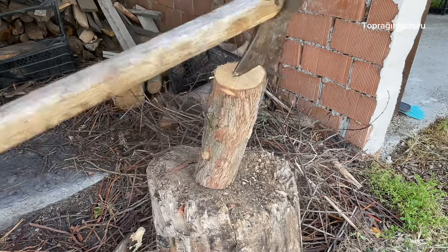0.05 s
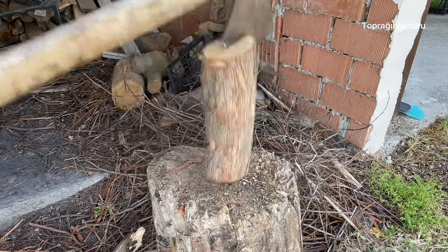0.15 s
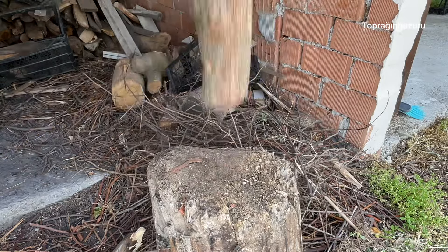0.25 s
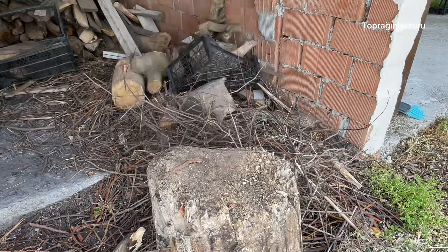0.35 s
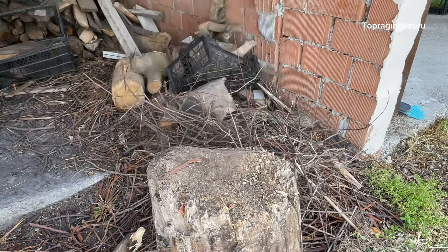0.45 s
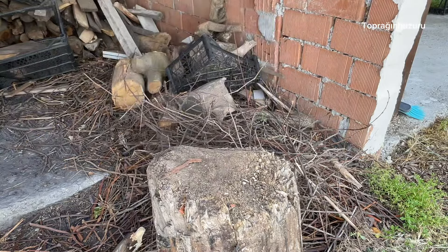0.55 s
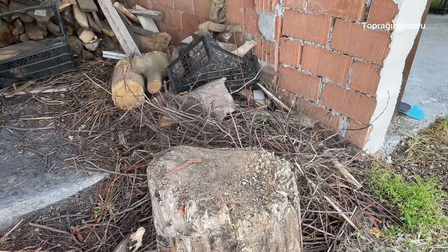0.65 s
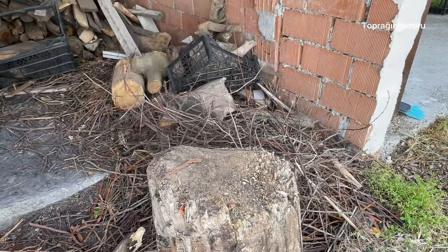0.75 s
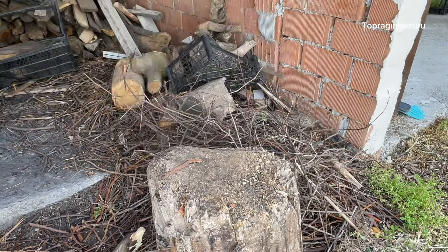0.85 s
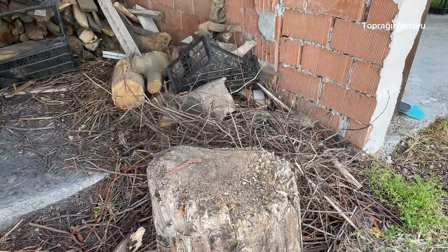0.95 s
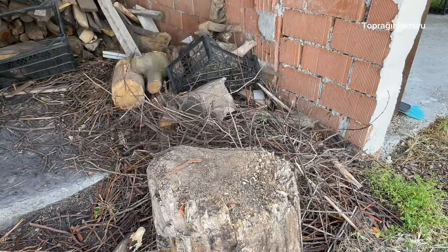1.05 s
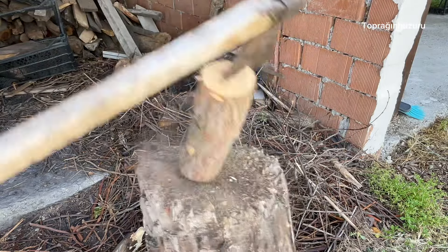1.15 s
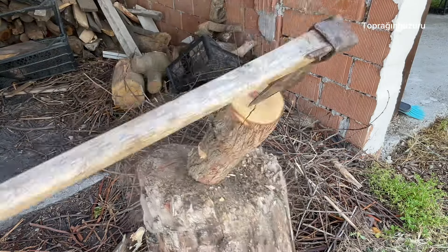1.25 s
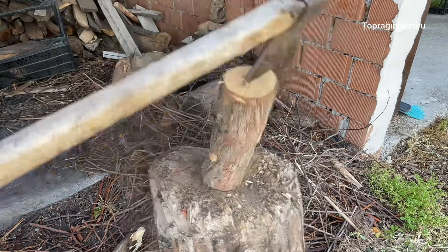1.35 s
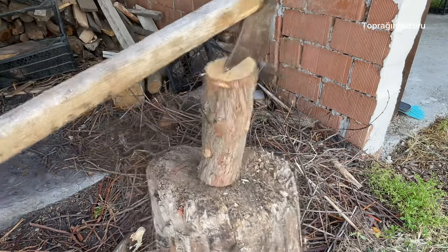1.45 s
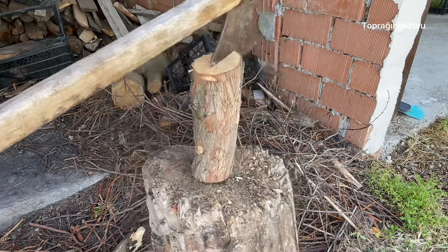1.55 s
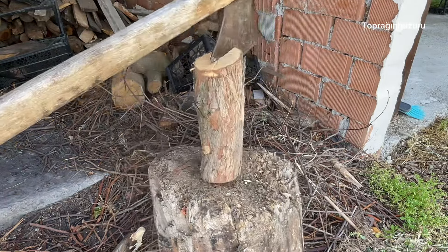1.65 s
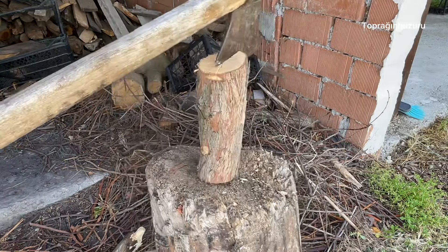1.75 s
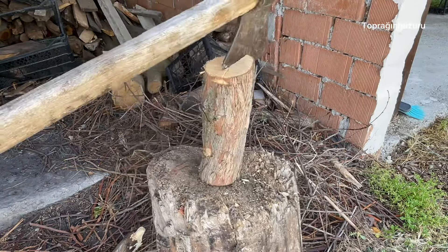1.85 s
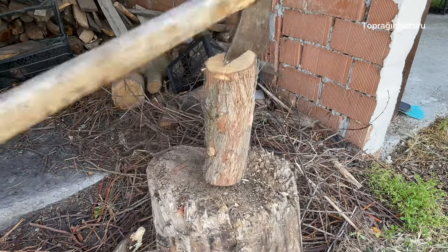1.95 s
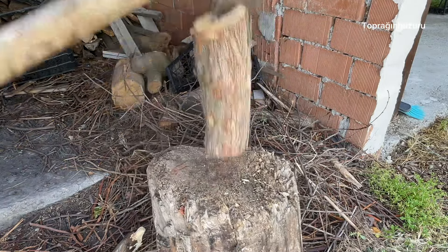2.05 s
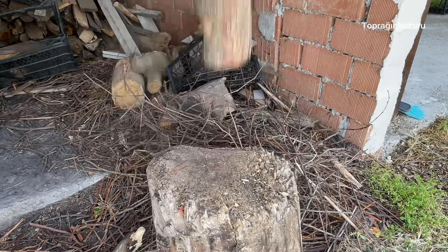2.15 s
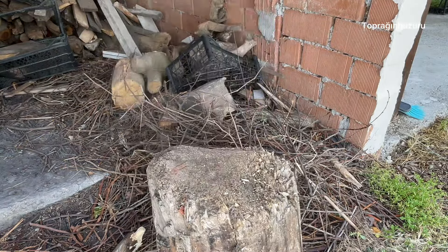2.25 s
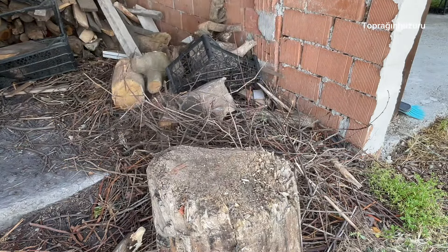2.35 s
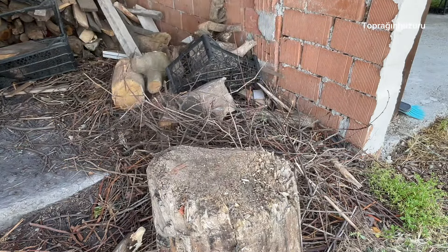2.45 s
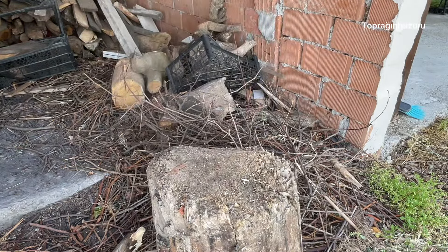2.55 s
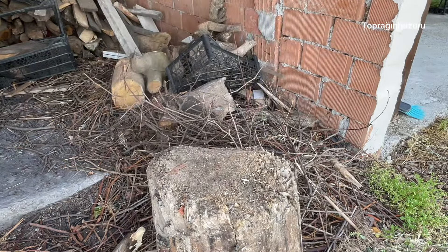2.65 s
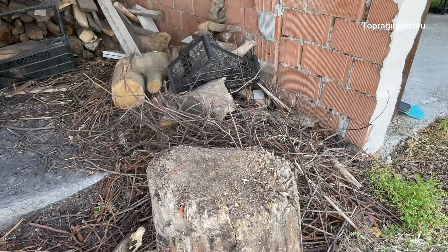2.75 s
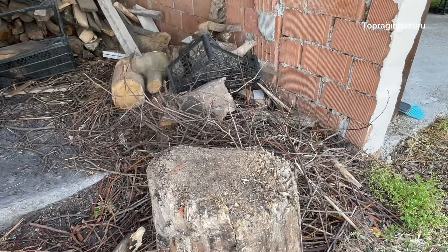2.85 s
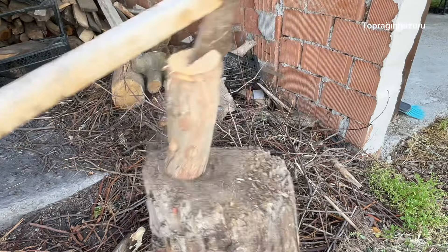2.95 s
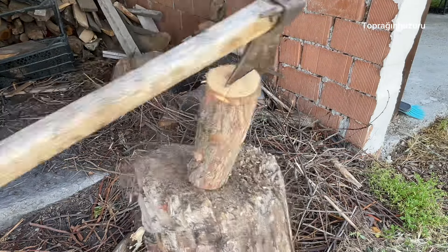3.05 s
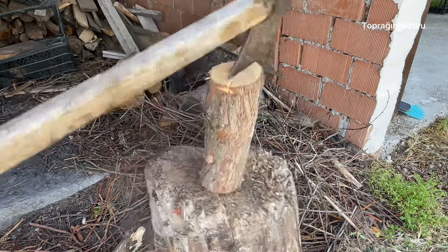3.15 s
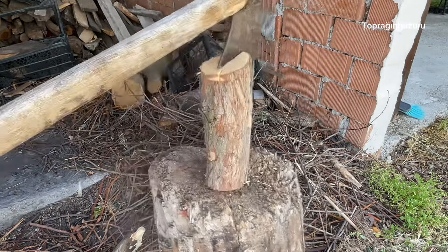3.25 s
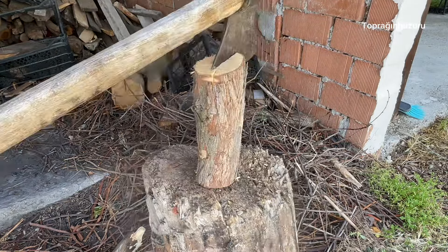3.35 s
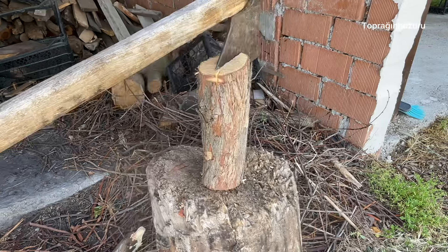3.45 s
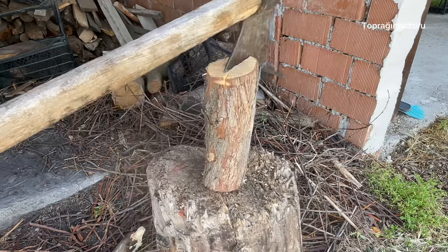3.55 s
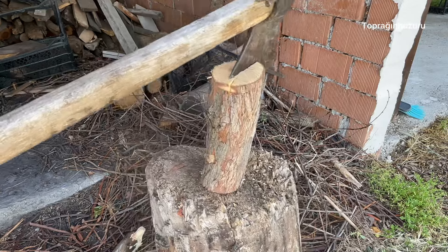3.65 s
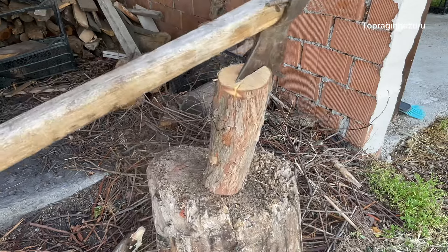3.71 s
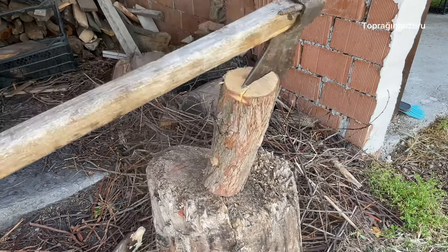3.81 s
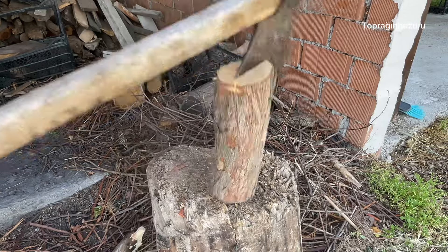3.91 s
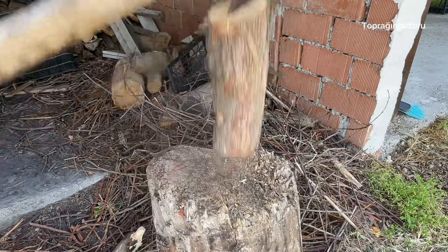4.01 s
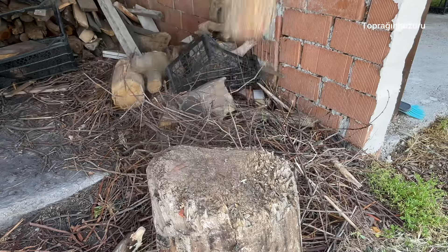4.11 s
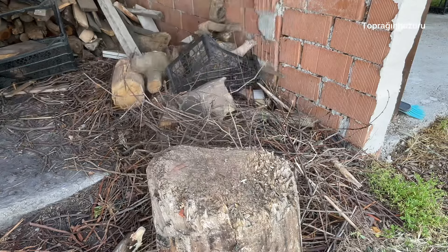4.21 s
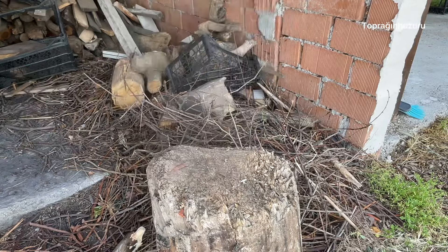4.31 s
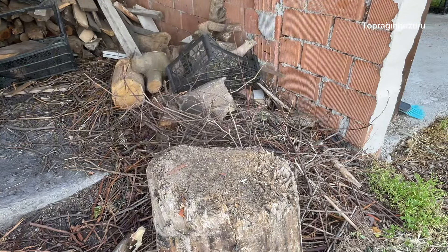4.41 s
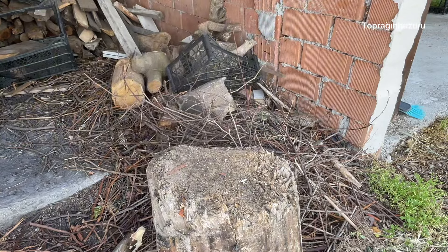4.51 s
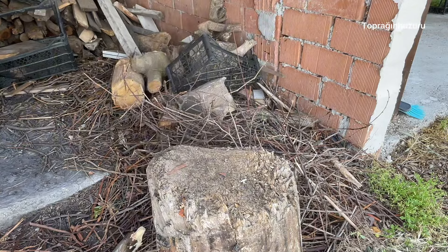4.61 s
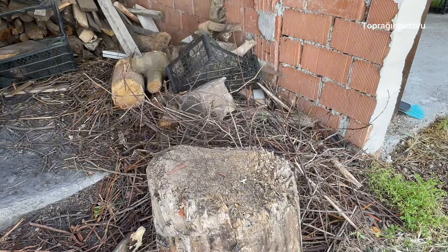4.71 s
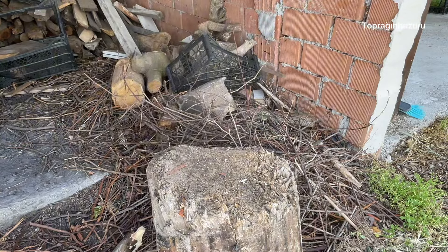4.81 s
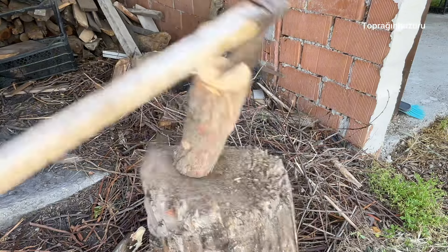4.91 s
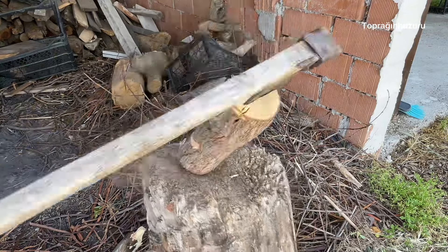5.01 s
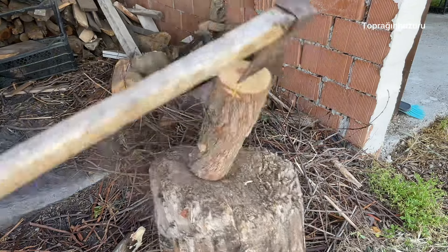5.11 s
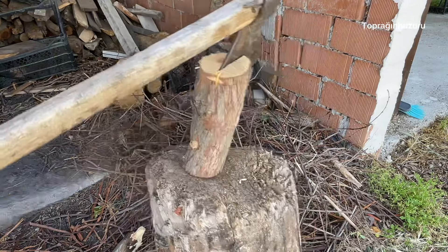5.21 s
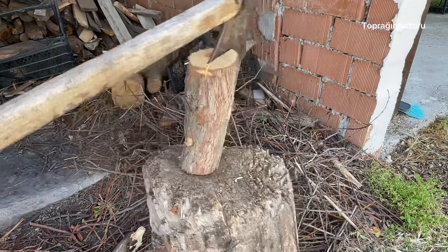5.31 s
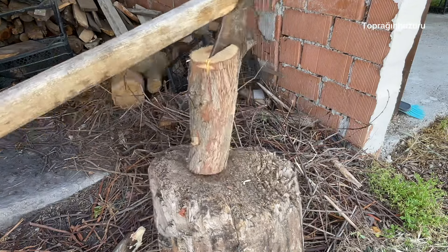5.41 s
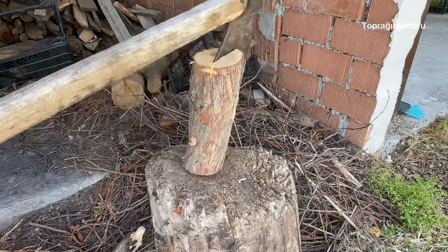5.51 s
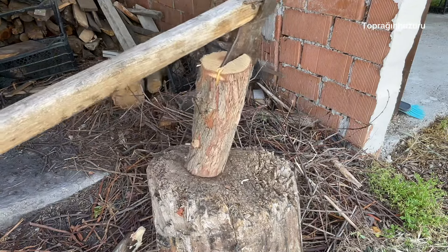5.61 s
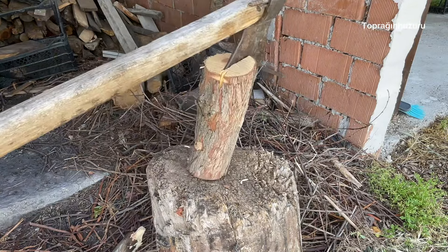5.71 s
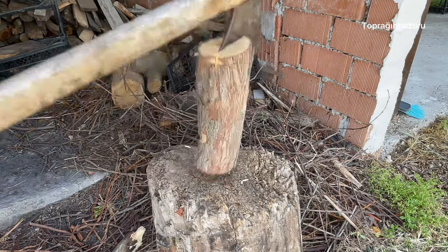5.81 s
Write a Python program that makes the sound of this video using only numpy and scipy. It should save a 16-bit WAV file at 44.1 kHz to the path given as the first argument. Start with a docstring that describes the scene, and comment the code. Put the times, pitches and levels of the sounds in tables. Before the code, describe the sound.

A log stuck on an axe cracks and thumps on a chopping block three times, about two seconds apart, in a quiet yard.

```python
"""A yard beside a brick wall: a short log with an axe stuck in it is slammed three times onto a stump, a metre off.
Each blow is a sum of filtered noise (crack), damped modes (log, handle, stump), slow wave packets (ground)
and echoes by convolution; bark crumbs and dust patter down as shaped noise. Behind lie far birds, as
frequency-modulated sines with diffuse echoes, and a low town rumble of noise bands and wavering hum.
"""
import sys
import numpy as np
from scipy import signal
from scipy.fft import rfft, irfft
from scipy.io import wavfile
from scipy.ndimage import uniform_filter1d

SR = 44100
rng = np.random.default_rng(int(sys.argv[2]) if len(sys.argv) > 2 else 0)


def generate_wav(sig):
    """Save sig (samples, or channels by samples) to the path in sys.argv[1] as 16-bit PCM at SR."""
    pcm = np.round(np.clip(np.atleast_2d(sig).T, -1, 1) * 32767).astype(np.int16)
    wavfile.write(sys.argv[1], SR, pcm)


N = 258867  # length in samples


def undb(db):
    """Logarithmic scale: the amplitude factor of a level in dB."""
    return 10 ** (np.asarray(db) / 20)


def level(x, db):
    """Mean power: scale to an rms level."""
    return x * undb(db) / np.sqrt(np.mean(x ** 2))


def fade(t, t60):
    """Exponential damping: 60 dB down after t60."""
    return np.exp(-np.log(1000) * t / t60)


def band(x, hz, octaves):
    """Band-pass filtering along the last axis, centred on hz."""
    top_hz = min(hz * 2 ** (octaves / 2), .48 * SR)
    edges = [hz * 2 ** (-octaves / 2), top_hz]
    return signal.sosfilt(signal.butter(2, edges, "band", fs=SR, output="sos"), x)


def bright(x):
    """Cascaded filtering: three passes give a treble band with steep sides."""
    for _ in range(3):
        x = band(x, 11000, .65)
    return x


def colour(x, points):
    """Spectral weighting by (f/Hz, level/dB) points, joined along log frequency."""
    hz, db = np.transpose(points)
    f = np.fft.rfftfreq(x.shape[-1], 1 / SR) + 1
    gain = undb(np.interp(np.log(f), np.log(hz), db))
    return irfft(rfft(x) * gain, x.shape[-1])


def walk(rate, size=N):
    """Slow random modulation: levels held 1 / rate s and smoothed twice; spread near 1."""
    k = int(SR / rate)
    held = np.repeat(rng.standard_normal(size // k + 1), k)
    return 1.4 * uniform_filter1d(uniform_filter1d(held, k), k)[:size]


def pan(db):
    """Level difference between the ports: left over right in dB."""
    return undb(np.array([[db], [-db]]) / 2)


def add(out, s, x):
    """Superposition: mix x in at s seconds."""
    i = int(s * SR)
    n = min(x.shape[-1], N - i)
    out[..., i:i + n] += x[..., :n]


# Spectrum of the rumble: (f/Hz, relative level per Hz/dB)
RUMBLE_SPECTRUM = [(20, -40), (36, -16), (50, 1), (76, -9.5), (145, -12), (194, -14), (247, -16),
                   (330, -16), (463, -22.5), (682, -19.5), (808, -27.5), (1590, -38), (4830, -51),
                   (8030, -60), (11000, -64.5), (14300, -85.5), (22000, -120)]
# Left-right correlation of the rumble: (f/Hz, correlation)
COHERENCE = [(60, 1), (130, 0.13), (290, 0.28), (640, -0.29), (1410, -0.077), (3100, 0.76), (6820, -0.02),
             (15000, 0.93)]
RUMBLE_DB = -62  # rms before the left-right tilt


def rumble():
    """Partial coherence: half-octave noise bands mix a mid and a side signal; they swell together, flicker alone."""
    out, swell_db = 0, walk(.8)
    mid, side = colour(rng.standard_normal((2, N)), RUMBLE_SPECTRUM)
    hzs, correlations = np.transpose(COHERENCE)
    for hz in 28 * 2 ** np.arange(0, 9.5, .5):
        c = np.clip(np.interp(np.log(hz), np.log(hzs), correlations), -.95, .99)
        common = np.sqrt(1 + c) * band(mid, hz, .5)
        opposed = np.sqrt(1 - c) * band(side, hz, .5) * np.array([[1], [-1]])
        flicker_db = (.8 + 40 / hz) * walk(8)  # the bass flickers most
        out = out + (common + opposed) * undb(swell_db + flicker_db)
    return level(out, RUMBLE_DB)


# Hum tones of far machines: (mean f/Hz, base level/dB, share of the load level it follows)
HUM_TONES = [(100, -72, 0.1), (193.6, -75.5, 1.0), (334, -86.5, .3)]
# Load level of the machines: (t/s, level/dB)
LOAD_LEVEL = [(0, -0.5), (1.2, 2), (1.7, 4), (2.85, 3.5), (3.201, -1.5), (4.2, 1), (5.87, -1)]


def hum():
    """Frequency and amplitude modulation: far machines hum in sines whose pitch and level waver."""
    load_db = np.interp(np.arange(N) / SR, *np.transpose(LOAD_LEVEL))
    out = 0
    for mean_hz, db, share in HUM_TONES:
        hz = mean_hz * (1 + .015 * walk(6))
        tone = np.sin(2 * np.pi * np.cumsum(hz) / SR)
        out = out + np.sqrt(2) * undb(db + share * load_db + 2.5 * walk(5)) * tone
    return out


def town():
    """Superposition of rumble and hum, stronger on the right."""
    return (rumble() + hum()) * pan(-2.2)


def call(length, first_hz, last_hz, bend, hoarse, db, pan_db):
    """Frequency modulation: one gliding note with a shaky pitch; bend is the share of the glide done halfway."""
    u = np.linspace(0, 1, int(length * SR))
    hz = first_hz + (last_hz - first_hz) * np.interp(u, [0, .5, 1], [0, bend, 1])
    hz = hz * (1 + hoarse * walk(500, size=len(u)))
    tone = np.sin(2 * np.pi * np.cumsum(hz) / SR) * signal.windows.tukey(len(u), .4)
    return tone * undb(db) * pan(pan_db)


# Hoarse falling chirps: (t/s, first f/Hz, level before echo/dB, length/s); the direct sound is weaker
CHIRP_CALLS = [(0.453, 5860, -71.5, .11), (0.689, 4570, -79, 0.097), (1.43, 5550, -72, 0.096),
               (1.866, 5200, -78, 0.1), (2.252, 5400, -76.5, 0.079), (2.5, 6200, -74, 0.091),
               (3.35, 5400, -72.5, 0.074), (3.906, 5200, -75, 0.056), (4.01, 4780, -77.5, 0.0974),
               (4.202, 4000, -71.5, 0.075), (4.543, 6000, -73, 0.085), (5.26, 4800, -77, 0.074)]
# Clearer whistles: (t/s, length/s, first f/Hz, last f/Hz, direct level/dB, hoarseness as relative pitch spread)
WHISTLE_CALLS = [(0.018, 0.055, 2266, 2182, -78.5, 0.033), (2.096, 0.098, 1970, 1906, -80, 0.052),
                 (2.215, 0.14, 2260, 1872, -70.5, 0.0066), (2.31, 0.089, 1820, 1797, -83, .006),
                 (2.504, .19, 2190, 1910, -77.5, 0.07), (2.718, 0.24, 3000, 1890, -71, 0.059),
                 (3.083, 0.2466, 2330, 2310, -78, 0.036), (3.341, 0.11, 3050, 2100, -72.5, 0.03),
                 (3.431, 0.14, 2005, 1933, -75.5, 0.012), (3.753, .06, 1921, 2860, -86, 0.026),
                 (4.472, .1, 2100, 2142, -87, 0.011), (4.616, 0.076, 3680, 3715, -80.5, .02),
                 (4.64, 0.053, 1850, 1854, -84, 0.012)]
CHIRP_FALL_OCT_S, CHIRP_BEND, CHIRP_HOARSE = 5.5, 0.92, 0.15
WHISTLE_BEND = 0.95
CHIRP_PAN_DB, WHISTLE_PAN_DB = 0, -3  # left over right
CHIRP_ECHO_DB, WHISTLE_ECHO_DB, BIRD_T60_S = 9, 2, .24  # echo over direct sound


def birds():
    """Diffuse reverberation: far chirps and whistles are smeared by convolution with decaying noise."""
    chirps, whistles = np.zeros((2, 2, N))
    for s, hz, db, length in CHIRP_CALLS:
        last_hz = hz * 2 ** (-CHIRP_FALL_OCT_S * length)
        add(chirps, s, call(length, hz, last_hz, CHIRP_BEND, CHIRP_HOARSE, db - CHIRP_ECHO_DB, CHIRP_PAN_DB))
    for s, length, first_hz, last_hz, db, hoarse in WHISTLE_CALLS:
        add(whistles, s, call(length, first_hz, last_hz, WHISTLE_BEND, hoarse, db, WHISTLE_PAN_DB))
    t = np.arange(int(.4 * SR)) / SR
    smear = rng.standard_normal((2, len(t))) * fade(t, BIRD_T60_S)
    smear = smear / np.sqrt(np.sum(smear ** 2, axis=1, keepdims=True))  # unit energy
    far = chirps * undb(CHIRP_ECHO_DB) + whistles * undb(WHISTLE_ECHO_DB)
    return chirps + whistles + signal.fftconvolve(far, smear, axes=1)[:, :N]


# Bark dust after each full blow: (blow t/s, level before flurries/dB, time after the blow when it thins out/s)
DUST_FALLS = [(1.0724, -80, 0.57), (2.9066, -82, .6), (4.8559, -84.5, .58)]
DUST_PEAK_S, DUST_RISE_DB_S, DUST_FALL_DB_S = .2, 69, 52.5
COARSE_DB = 0.5  # coarse grains over fine
FLURRY_DB, SWELL_DB, PATTER_DB = 3.0, 2.5, 2.8  # spreads of quick flurries, slower swells and grain sizes


def dust():
    """Shot noise: tiny grains of uneven size fall in flurries, which build up, keep on a while and thin out."""
    grains = rng.standard_normal((2, N)) * undb(PATTER_DB * rng.exponential(size=(2, N)))
    fine = level(bright(grains), 0)
    coarse = level(band(grains, 6600, 0.62), COARSE_DB)
    flurry_db = FLURRY_DB * walk(80) + SWELL_DB * walk(14)
    time, gain = np.arange(N) / SR, 0
    for s, db, falling_s in DUST_FALLS:
        t = time - s
        rise_db = DUST_RISE_DB_S * np.maximum(DUST_PEAK_S - t, 0)
        fall_db = DUST_FALL_DB_S * np.maximum(t - falling_s, 0)
        gain = gain + (t > 0) * undb(db - rise_db - fall_db + flurry_db)
    return gain * (fine + coarse)


# Wood creaks and crumbs that land: (t/s, click level/dB, body level/dB, knock level/dB), before the envelope
TICK_EVENTS = [(0.0585, -76, -68, -60.5), (1.1384, -57, -71, -60), (1.5894, -58, -65, -66),
               (1.607, -63, -69.5, -76), (1.729, -58.5, -65, -63.5), (1.835, -73, -70, -84.5),
               (1.8571, -68, -72, -80), (1.92, -75, -87, -83), (2.8395, -84.5, -64.5, -59.5),
               (3.27, -77.5, -72, -58.5), (3.3298, -53, -59.5, -72), (3.3937, -64.5, -74, -65),
               (3.5644, -69, -80, -65.5), (3.6036, -63.5, -91.5, -72.5), (3.8147, -70, -79.5, -80),
               (4.104, -69, -78, -77), (4.2327, -87, -72, -63.5), (5.0379, -55.5, -62, -58),
               (5.0599, -55.5, -61, -54), (5.2658, -79.5, -81, -68), (5.3542, -63.5, -71.5, -73),
               (5.3851, -70.5, -85, -76), (5.5691, -63.5, -53, -51), (5.769, -50.5, -46.5, -73.5)]
# The log's foot and the handle scrape and creak: the same columns, then (t60/s)
SCRAPE_EVENTS = [(0.5202, -90, -72, -65, .04), (0.9628, -94, -69.5, -66.5, 0.12),
                 (1.464, -63.5, -57, -58, .12)]
TICK_T60_S, TICK_PAN_DB = 0.012, 2  # left over right
RUSTLE_DB, RUSTLE_T60_S = -15, 0.12


def ticks():
    """Transient excitation: decaying noise bands give a click, a wooden body, a low knock and a faint rustle."""
    out, t = np.zeros((2, N)), np.arange(int(.2 * SR)) / SR
    events = [(*row, TICK_T60_S) for row in TICK_EVENTS]
    for s, click_db, body_db, knock_db, t60 in [*events, *SCRAPE_EVENTS]:
        noise = rng.standard_normal((3, len(t)))
        noise = noise[0] + .5 * noise[1:]  # partly common to both ports
        click = level(bright(noise), click_db)
        body = level(band(noise, 3200, 1.3), body_db)
        knock = level(band(noise, 490, 3.2), knock_db)
        # the first touch is firm, the rest uneven
        scratch = undb(2.5 * walk(250, size=len(t)) * (1 - fade(t, .06)))
        decay = fade(t, t60) + undb(RUSTLE_DB) * fade(t, RUSTLE_T60_S)
        shape = decay * scratch * (1 - np.exp(-t / 0.00038))
        add(out, s - .001, (click + body + knock) * shape * pan(TICK_PAN_DB))
    return out


# Yard echo bands: (f/Hz, early level/dB, early t60/s, late level/dB, late t60/s)
YARD_BANDS = [(120.9, -48.5, 0.17, -58, 0.91), (254.5, -55.5, 0.057, -74.5, 1), (546, -46, 0.22, -59.5, .5),
              (760, -47, .2, -63.5, 0.18), (1050, -45.5, 0.12, -67, 0.59), (1450, -46.5, 0.16, -58.5, 0.41),
              (2110, -48.5, 0.19, -62.5, 0.38), (2880, -52.5, .1, -64.5, .45),
              (4100, -51.5, 0.1, -65.5, 0.4), (5100, -53, .1, -68.5, 0.38), (7100, -51, 0.27, -67.5, 0.3),
              (11200, -49.5, 0.28, -79.5, .3)]


def yard(x, t):
    """Double-slope reverberation: grainy, quick from near wall and woodpile, slow from further buildings."""
    echo = 0
    grain = undb(2.0 * rng.exponential(size=len(t) // 64 + 1)).repeat(64)[:len(t)]
    for hz, db, t60, late_db, late_t60 in YARD_BANDS:
        noise = rng.standard_normal((3, len(t))) * grain
        noise = noise[0] + min(hz / 250, 3) * noise[1:]  # long waves reach both ports alike
        decay = undb(db) * fade(t, t60) + undb(late_db) * fade(t, late_t60)
        echo = echo + level(band(noise, hz, 0.67), 0) * decay
    echo = echo * np.clip((t - .004) / .006, 0, 1)
    return signal.fftconvolve(x[None], echo, axes=1)[:, :len(t)]


WALL_S, WALL_DB, WALL_HZ = 0.03, -12, 740  # delay, level and band centre


def wall(x, t):
    """Specular reflection: one distinct, dull slap from a wall some metres off."""
    return undb(WALL_DB) * band(x * fade(t, 0.12), WALL_HZ, 1.3)


# The ground shudders in slow waves: (delay of the crest/s, f/Hz, level over the stump's/dB, length/s)
GROUND_WAVES = [(.01, 80.04, -28, 0.022), (0.064, 135.3, -37, 0.012), (0.114, 69.26, -38.5, 0.023),
                (0.23, 67.9, -36.5, 0.029), (.34, 55.93, -45.5, 0.033), (0.433, 52.8, -53.5, 0.11)]


def ground(t, stump_db):
    """Wave packets: sines under Gaussian envelopes arrive one after another."""
    out = 0
    for delay, hz, db, length in GROUND_WAVES:
        envelope = np.exp(-((t - delay) / length) ** 2)
        out = out + undb(stump_db + db) * envelope * np.sin(2 * np.pi * hz * t)
    return out


def ring(modes, t, pitch, cycles):
    """Modal synthesis: damped modes build up over some of their own cycles, low ones late; neighbours swing opposite."""
    t, out = np.maximum(t, 0), 0
    for k, (hz, db, t60) in enumerate(modes):
        build_up = 1 - np.exp(-(t * hz / cycles) ** 2)
        tone = fade(t, t60) * np.sin(2 * np.pi * hz * pitch * t)
        out = out + (-1) ** k * undb(db) * tone * build_up
    return out


RIGHT = np.array([[0], [1]])  # 1 for the right port, which hears the log and stump later
# Stump modes: (f before the blow's pitch factor/Hz, level relative to the blow's/dB, t60/s)
STUMP_MODES = [(182.5, -0.5, .03), (292, 0.5, 0.035), (410, -3, 0.041), (605, -9, 0.033), (824, -3, 0.038)]
STUMP_DELAY_S, STUMP_LAG_S = .003, .00033  # the push needs time to pass into the heavy block


def stump_thump(t, db, pitch):
    """Modal response of a heavy block, which starts late and swings opposite to the log."""
    return -undb(db) * ring(STUMP_MODES, t - STUMP_DELAY_S - RIGHT * STUMP_LAG_S, pitch, 0.51)


# Log and handle modes: (f before the blow's pitch factor/Hz, level relative to the blow's/dB, t60/s)
LOG_MODES = [(682.6, -1, 0.03), (893, 0.5, 0.012), (1087, -7, 0.043), (1259, -6.5, 0.035),
             (1614, -5.5, .018)]
HANDLE_MODES = [(690, -30, 0.054), (766, -30.5, 0.038), (1123, -36, .1)]
LATE_CYCLES, LOG_LAG_S = 1.1, .00012  # bending waves spread out: time scale of build-up in cycles


def log_ring(t, db, pitch):
    """Bending modes: log and handle ring together."""
    return undb(db) * ring([*LOG_MODES, *HANDLE_MODES], t - RIGHT * LOG_LAG_S, pitch, LATE_CYCLES)


# Spectrum of the crack: (f/Hz, relative level/dB)
CRACK_SPECTRUM = [(1200, -18), (2200, 3.5), (3200, -3), (4400, -5.5), (6300, -9), (10000, -9.5),
                  (13000, -16), (16000, -27.5)]
CRACK_T60_S, SNAP_DB, SNAP_T60_S = 0.037, 7, 0.0044  # fibres tear on after a sharper first snap
CRACK_TURN = 2  # phase by which the crack differs between the ports (radians)


def fibre_crack(t, db):
    """Fracture noise with a two-stage decay; the analytic signal turns its phase between the ports."""
    noise = level(colour(rng.standard_normal(len(t)), CRACK_SPECTRUM), db)
    decay = fade(t, CRACK_T60_S) + undb(SNAP_DB) * fade(t, SNAP_T60_S)
    crack = noise * (1 - np.exp(-t / 0.00027)) * decay
    return np.real(signal.hilbert(crack) * np.exp(.5j * CRACK_TURN * (1 - 2 * RIGHT)))


# Blows: (contact t/s, log level/dB, crack level before the envelope/dB, stump level/dB, log pitch factor,
# stump pitch factor, yard echo level/dB); the weak row is a rebound
BLOW_EVENTS = [(1.072, -3, -14, -3.5, 0.96, 0.96, -4.5), (2.9067, -3.5, -15.5, -6, 1.02, 0.99, -3.5),
               (2.983, -36.5, -55, -30, .75, 1.35, -10), (4.8556, -4.5, -18.5, -5.5, 1.013, 1.01, -4.5)]


def blows():
    """Impact excitation: fibres crack, log and handle ring, the stump thumps; yard and ground answer."""
    out, t = np.zeros((2, N)), np.arange(int(.8 * SR)) / SR
    snap = level(colour(signal.unit_impulse(len(t), 128), CRACK_SPECTRUM), 0)
    for s, log_db, crack_db, stump_db, log_pitch, stump_pitch, yard_db in BLOW_EVENTS:
        crack = fibre_crack(t, crack_db)
        log = log_ring(t, log_db, log_pitch)
        stump = stump_thump(t, stump_db, stump_pitch)
        # the walls get the loud first moments; from afar the crack is one snap of the same energy
        far_snap = snap * np.sqrt(np.mean(crack ** 2))
        far = far_snap + (log[0] + stump[0]) * fade(t, .04)
        add(out, s + WALL_S, wall(log + stump, t))
        add(out, s, crack + log + stump + undb(yard_db) * yard(far, t) + ground(t, stump_db))
    return out


def scene():
    """Superposition of all sources."""
    return town() + birds() + dust() + ticks() + blows()


TOP_HZ = 16800


def record(dry):
    """Transducer response: a phone's ports dip near 8 kHz, the loudest peaks are rounded and the top is cut."""
    b, a = signal.iirnotch(8300, 3.0, SR)
    port = dry - 0.9 * (dry - signal.lfilter(b, a, dry))
    rounded = np.tanh(.8 * port) / .8
    return signal.sosfilt(signal.ellip(10, .2, 80, TOP_HZ, fs=SR, output="sos"), rounded)


dry = scene()
out = record(dry)
generate_wav(out)
```